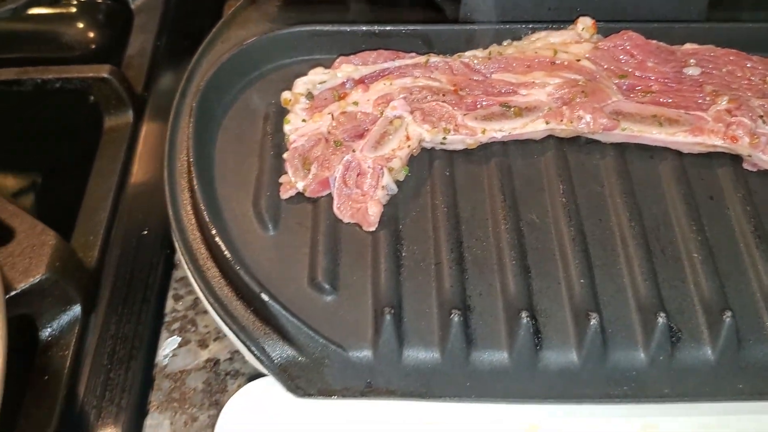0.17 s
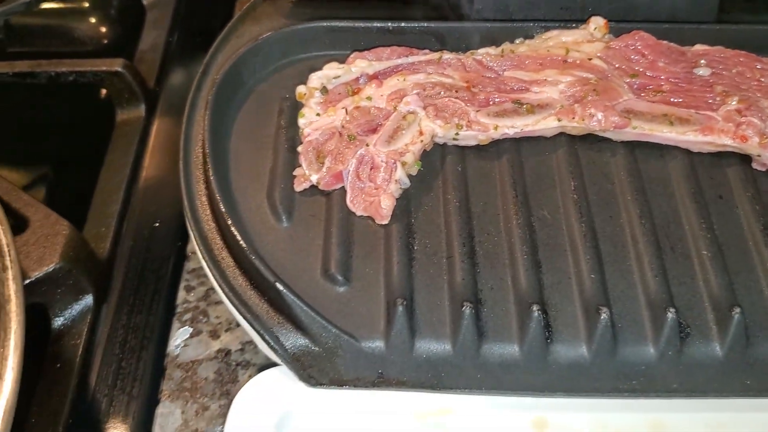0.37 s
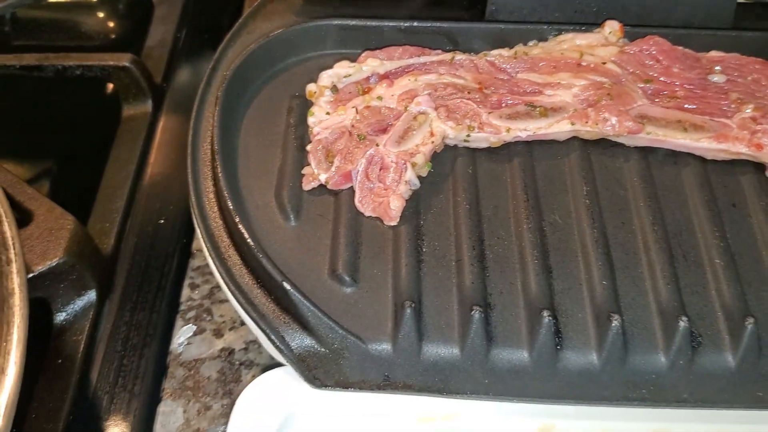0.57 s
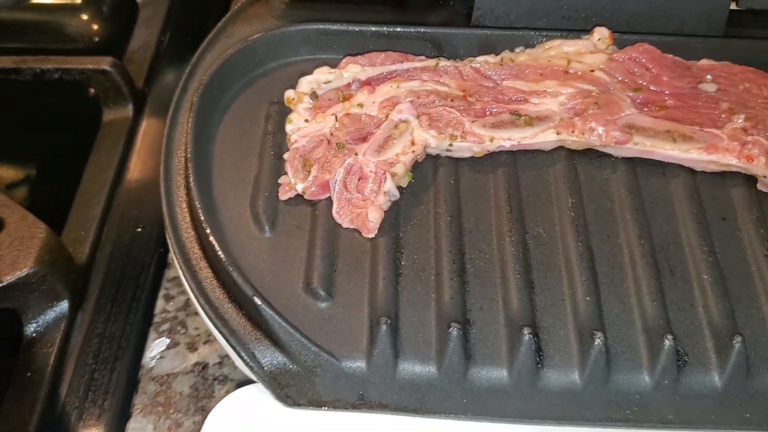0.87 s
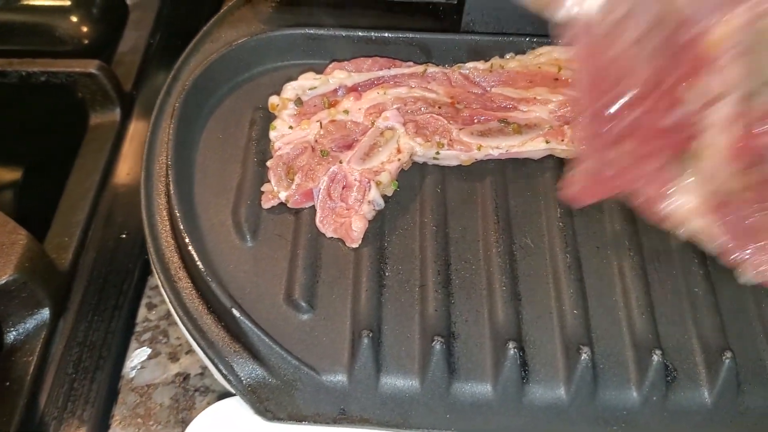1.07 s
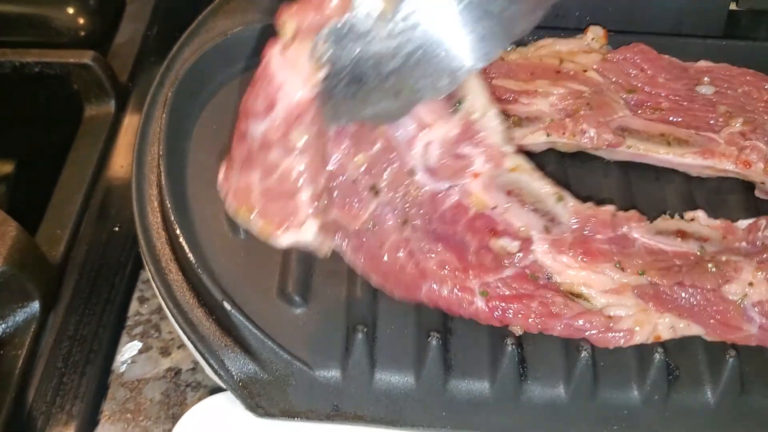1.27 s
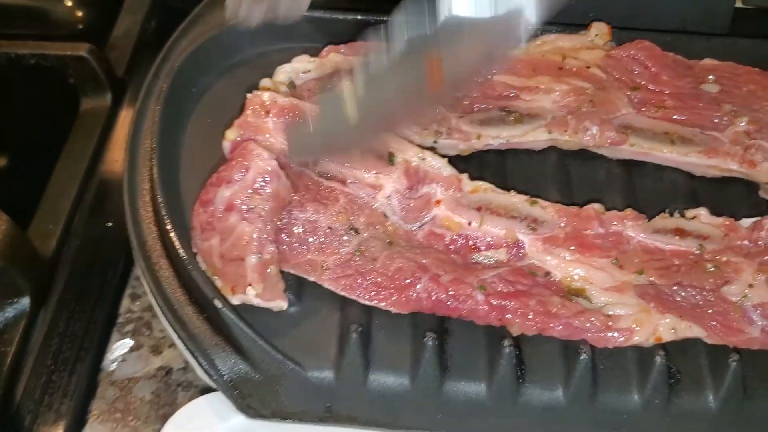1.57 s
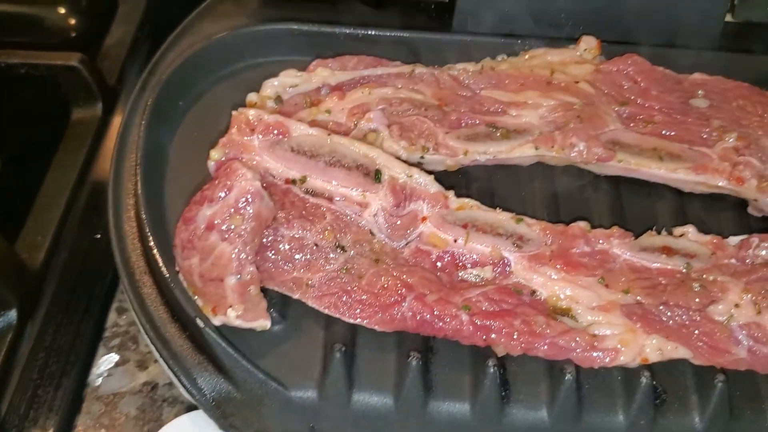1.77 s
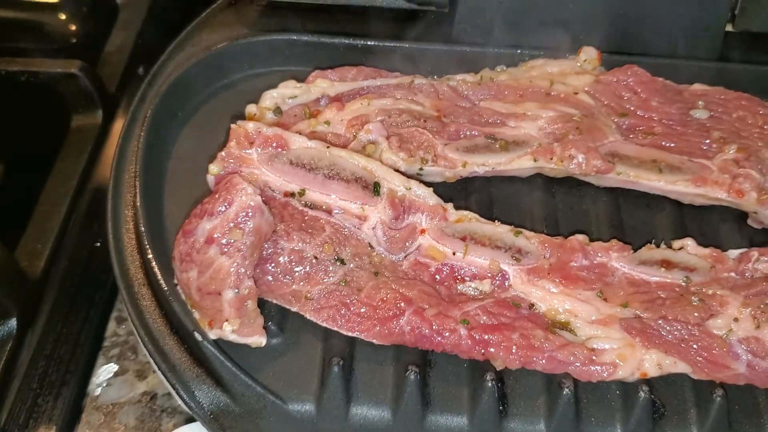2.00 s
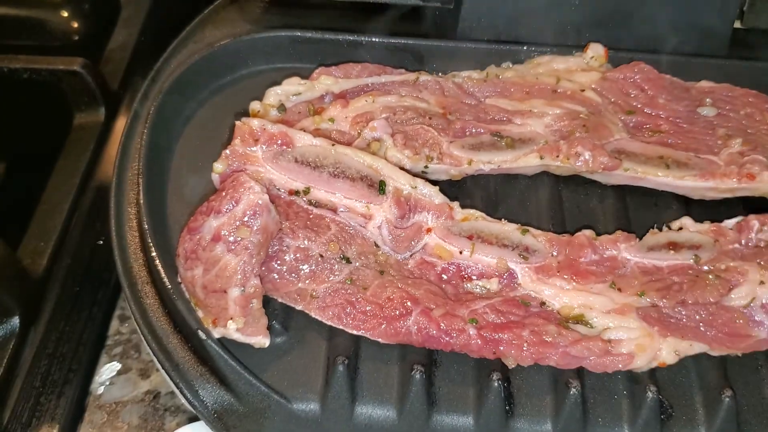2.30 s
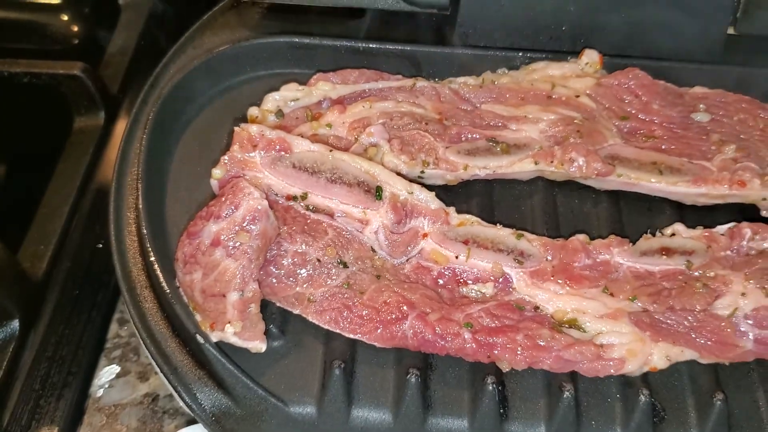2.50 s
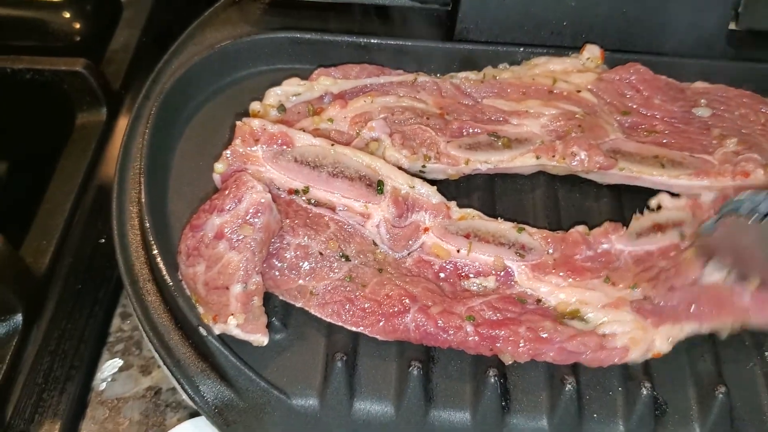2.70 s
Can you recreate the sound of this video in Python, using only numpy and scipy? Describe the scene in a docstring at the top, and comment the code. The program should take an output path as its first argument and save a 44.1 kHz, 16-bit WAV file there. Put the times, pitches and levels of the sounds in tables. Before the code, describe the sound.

Meat sizzles densely and steadily on a grill plate, close to the microphone, with sharp spits of fat, the loudest near 0.8 seconds. At about 1.2 seconds a second strip goes on with a bright hiss, slightly to the right, and the sizzle stays fuller to the end. A soft knock comes at 2 seconds, then a faint, brief squeak. A very low kitchen hum lies underneath.

```python
"""A dense sizzle, close up: marinated meat frying on an electric grill plate, on a phone's two microphones
in a kitchen. Thousands of tiny steam bubbles burst each second and fat spits now and then. A second
strip is laid down, hisses brightly as its marinade flashes to steam, and traps steam in the grooves.
A soft knock on the grill and a short squeak follow; mains hum and low room tone lie behind it all."""
import sys
import numpy as np
from scipy import signal
from scipy.fft import rfft, irfft
from scipy.io import wavfile
from scipy.ndimage import uniform_filter1d

SR = 44100
rng = np.random.default_rng(int(sys.argv[2]) if len(sys.argv) > 2 else 0)


def master_out(mix):
    """Clip the mix to full scale and print it as 16-bit PCM to the path in sys.argv[1]."""
    frames = np.transpose(np.atleast_2d(mix))
    ceiling = np.clip(frames, -1, 1)
    pcm = np.round(ceiling * 32767).astype(np.int16)
    wavfile.write(sys.argv[1], SR, pcm)


N = 125685

# bubbles bursting under the first strip: frequency_hz, relative_db
FIRST_SPECTRUM = [(150, -26), (400, -19.5), (600, -20), (780, -12), (1100, -19), (1500, -13.5),
                  (1900, -7.5), (2200, -8), (2500, -3), (3400, -2), (4300, -1.5), (5500, -1.9),
                  (6600, -8.5), (8000, -8), (8900, -3), (10000, -4), (10900, -6.5), (12200, -4),
                  (15000, -6.5)]
# level of the first strip: time_s, level_db
FIRST_LEVEL = [(0, -21.5), (.35, -20.5), (.75, -21), (1.0, -20.5), (1.16, -21), (1.35, -21), (1.7, -21.5),
               (2.3, -21.5), (2.85, -22)]
# wet marinade flashing to steam at first touch: frequency_hz, relative_db
FLASH_SPECTRUM = [(1000, -19.5), (3000, -15), (5500, -8), (7000, -0.5), (8800, -2.5), (11000, -3),
                  (15000, 3.5)]
# the second strip once it lies flat: frequency_hz, relative_db
SECOND_SPECTRUM = [(200, -32), (600, -15), (1100, -15), (1500, -9), (2200, -5), (3400, 2), (4300, -1),
                   (5400, 1.5), (6800, -9), (9000, -4), (11000, -5.5), (15000, -1.5)]
# snap of spitting fat: frequency_hz, relative_db
SNAP_SPECTRUM = [(300, -35), (1200, -22), (2500, -4), (4500, 0), (7000, -7), (9500, -4), (15000, -4)]
# loudest spits of fat: start_s, peak_db (ahead of the pan), left_minus_right_db
LOUD_SPITS = [(.437, -12, -4), (0.452, -10, -3), (.818, -5, 3), (0.826, -8.5, 2), (1.261, -11, 2),
              (1.447, -9, 1), (1.507, -11, -4), (1.780, -7, -4), (2.201, -11, 0), (2.332, -11, -3)]
# gaps under the first strip: pitch_hz, nominal_width_hz, relative_db
FIRST_POCKETS = [(2488, 62, -2), (2997, 180, -6), (4226, 220, -3), (5450, 180, -6.5), (5770, 120, -3)]
# steam pockets between the second strip and the grooves: pitch_hz, nominal_width_hz, relative_db
SECOND_POCKETS = [(2612, 134, 1), (3330, 180, -10), (4550, 290, -9), (5330, 190, -16), (8600, 250, -6)]
# level of those steam pockets: time_s, level_db
SECOND_POCKET_LEVEL = [(0, -69), (1.4, -34), (1.65, -31.5), (1.9, -34), (2.08, -38), (2.22, -34.5),
                       (2.55, -28.5), (2.85, -39)]
# hollow ring while the tongs are near the plate: pitch_hz, nominal_width_hz, relative_db
HOLLOW_MODES = [(1930, 260, 0), (2530, 350, -7)]
# swells of that ring: centre_s, half_length_s, level_db
HOLLOW_SWELLS = [(1.262, .1, -35.5), (2.798, 0.027, -34)]
# damped modes of the grill: pitch_hz, relative_db, t60_s
GRILL_MODES = [(160, -17, .06), (583, -1, 0.026), (850, -2, 0.028), (1050, 0.5, 0.025), (1380, -5, 0.027),
               (1600, -1, .025)]
# squeaks, probably steam forced out under the meat: start_s, length_s, start_hz, end_hz, level_db
SQUEAKS = [(2.162, 0.0178, 660, 670, -40), (2.179, 0.058, 690, 755, -36.5)]
# mains hum in the kitchen: pitch_hz, base_level_db
HUM_TONES = [(60, -63), (120, -59.5), (240, -65.5), (258.4, -69)]
# slow rise and fall of the hum: time_s, gain_db
HUM_GAIN = [(0, -1), (.5, 0), (.8, 3.5), (1.25, 2), (1.6, -0.5), (2.4, -3), (2.85, -1)]
# kitchen room tone: frequency_hz, relative_db
ROOM_SPECTRUM = [(25, -26), (60, -6), (100, -5), (190, -6.5), (300, -11), (420, 3), (720, 3.5),
                 (1100, -3.5), (3000, -23)]
# colour of the phone's two microphone ports: frequency_hz, left_minus_right_db
PORT_BALANCE = [(200, -1.3), (2400, -0.8), (3400, -0.0), (5400, -3), (6600, 7.5), (7800, 2.7), (8700, -5),
                (9800, -6), (11000, 3.5), (12500, -0.7), (15000, 2)]
# how alike the sound is at the two ports: frequency_hz, correlation
PORT_LIKENESS = [(100, 0.75), (750, 0.91), (1250, 0.37), (1900, 0.44), (2600, 0.23), (3100, 0.033),
                 (15000, .01)]


def first_strip(shade_s=1.19, shade_half_s=.09, shade_db=-4):
    """Steady frying, its upper middle shaded as the second strip passes between it and the phone."""
    fry = sizzle(FIRST_SPECTRUM) * curve(FIRST_LEVEL)
    shade = (1 - undb(shade_db)) * swell(shade_s, shade_half_s)
    return fry - shade * resonate(fry, hz=4360, width_hz=2000)


def marinade_flash(touch_s=1.21, attack_s=.018, hold_s=.35, decay_s=.41, level_db=-23.5):
    """The second strip touches the plate and its wet marinade flashes to steam: a bright hiss, right."""
    age = times() - touch_s
    attack = np.clip(age / attack_s, 0, 1)
    decay = np.exp(-np.maximum(age - hold_s, 0) / decay_s)
    return sizzle(FLASH_SPECTRUM) * attack * decay * undb(level_db) * pan(-7.5)


def second_strip(laid_s=1.324, settle_s=.25, level_db=-23, fade_db_per_s=.16):
    """A fuller sizzle builds as the second strip settles flat on the plate."""
    age = times() - laid_s
    contact = np.clip(age / settle_s, 0, 1)
    return sizzle(SECOND_SPECTRUM) * contact * undb(level_db - fade_db_per_s * age)


def sizzle(spectrum):
    """Steam bubbles burst so densely that they merge into a hiss."""
    return unit(colour(bursts(per_s=16000, spread_db=2.5), spectrum))


def bursts(per_s, spread_db):
    """Random one-sample bursts, many small and a few large, as heard at both ports."""
    happens = rng.random((2, N)) < per_s / SR
    size = undb(spread_db * np.minimum(rng.exponential(size=(2, N)), 5))
    polarity = rng.choice([-1, 1], (2, N))
    return at_ports(happens * size * polarity)


def flurries(frying, bands=36, sputter_db=1.3, sputter_per_s=40):
    """Bubbles of each size, and so of each pitch, come in their own flurries."""
    spectrum, out = rfft(frying), 0
    band_position = over_hz([(1200, 0), (16000, bands - 1)])
    for k in range(bands):
        band = irfft(spectrum * np.maximum(1 - np.abs(band_position - k), 0), N)
        out += band * unit(undb(sputter_db * wander(sputter_per_s)))
    return out


def fat_spits(decay_s=.00014, crackle_db=-34):
    """Fat snaps sharply near the microphones: a few loud spits over a light random crackle."""
    out = unit(colour(bursts(per_s=260, spread_db=2.5), SNAP_SPECTRUM)) * undb(crackle_db)
    snap = colour(signal.unit_impulse(N), SNAP_SPECTRUM)[:SR // 100]
    age = times()[:len(snap)]
    for start_s, peak_db, pan_db in LOUD_SPITS:
        spray = rng.standard_normal((2, len(age))) * np.exp(-age / decay_s)
        spit = signal.lfilter(snap, 1, spray)
        start = int(start_s * SR)
        out[:, start:start + len(age)] += spit / np.abs(spit).max() * undb(peak_db) * pan(pan_db)
    return out


def steam_pockets(first_db=-29.5, first_fade_db_per_s=4):
    """Bursting bubbles ring the gaps under both strips and the hollow near the tongs."""
    drive = bursts(per_s=2500, spread_db=2)
    first = ring(drive, FIRST_POCKETS, flutter_db=1.8) * undb(first_db - first_fade_db_per_s * times())
    second = ring(drive, SECOND_POCKETS, flutter_db=1) * curve(SECOND_POCKET_LEVEL)
    tongs_near = sum(undb(db) * swell(centre_s, half_s) for centre_s, half_s, db in HOLLOW_SWELLS)
    hollow = ring(drive, HOLLOW_MODES, flutter_db=4) * tongs_near
    return first + second + hollow


def ring(drive, modes, flutter_db, flutter_per_s=32):
    """Bursts ring a set of resonances, each swelling and fading on its own."""
    out = 0
    for hz, width_hz, db in modes:
        stage_hz = 1.35 * width_hz  # two stages in series narrow the peak, so each is set wider
        ringing = resonate(resonate(drive, hz, stage_hz), hz, stage_hz)
        out += ringing * undb(db + flutter_db * wander(flutter_per_s))
    return unit(out)


def grill_knock(start_s=2.0465, contact_s=.0035, peak_db=-22, scuff_decay_s=.006, scuff_db=-9):
    """A soft, scuffing contact rings the damped modes of the grill."""
    age = np.maximum(times() - start_s, 0)
    body = sum(undb(db) * sine(hz, age) * undb(-60 * age / t60_s) for hz, db, t60_s in GRILL_MODES)
    scuff = rng.standard_normal(N)
    for _ in range(2):
        scuff = resonate(scuff, hz=850, width_hz=900)
    scuff *= np.exp(-age / scuff_decay_s)
    push = np.minimum(age / contact_s, 1) ** 2
    knock = unit(body * push) + undb(scuff_db) * unit(scuff * push)
    return knock / np.abs(knock).max() * undb(peak_db)


def squeaks(waver=.036, roughness=.31, release_share=.27):
    """Thin, rough tones rise, swell and stop: probably steam forced out under the meat."""
    out = np.zeros(N)
    for start_s, length_s, start_hz, end_hz, db in SQUEAKS:
        progress = np.clip((times() - start_s) / length_s, 0, 1)
        hz = (start_hz + (end_hz - start_hz) * progress) * (1 + waver * wander(250))
        tone = np.sqrt(2) * np.sin(2 * np.pi * np.cumsum(hz) / SR)
        envelope = np.sqrt(progress) * np.minimum((1 - progress) / release_share, 1)
        out += undb(db) * tone * envelope * (1 + roughness * wander(300))
    return out


def mains_hum(waver_db=-.5, waver_per_s=2.84):
    """An appliance hums in the background, each tone wavering slightly."""
    hum = sum(undb(db + waver_db * wander(waver_per_s)) * sine(hz, times()) for hz, db in HUM_TONES)
    return np.sqrt(2) * hum * curve(HUM_GAIN)


def room_tone(level_db=-51.5):
    """Low, steady noise of the kitchen around the phone."""
    air = at_ports(rng.standard_normal((2, N)))
    return unit(colour(air, ROOM_SPECTRUM)) * undb(level_db)


def at_ports(pair):
    """Two unrelated signals become two microphone ports: alike in the bass, unrelated in the treble."""
    likeness = np.clip(over_hz(PORT_LIKENESS), 0, 1)
    mid, side = rfft(pair) * np.sqrt([1 + likeness, 1 - likeness])
    return irfft(np.array([mid + side, mid - side]), N)


def pan(left_minus_right_db):
    return undb(np.array([[1], [-1]]) * left_minus_right_db / 2)


def undb(db):
    return 10 ** (np.asarray(db) / 20)


def unit(x):
    """Scale to rms 1."""
    return x / np.sqrt(np.mean(x ** 2))


def times():
    return np.arange(N) / SR


def sine(hz, time_s):
    """Sine with a random starting phase."""
    return np.sin(2 * np.pi * (hz * time_s + rng.random()))


def swell(centre_s, half_s):
    """Bell curve: 1 at the centre, 1/e at half_s to either side."""
    return np.exp(-((times() - centre_s) / half_s) ** 2)


def curve(rows):
    """Gain over time from (time_s, level_db) points."""
    return undb(np.interp(times(), *np.array(rows).T))


def wander(per_s):
    """Smooth random wander with rms 1."""
    step = max(int(SR / per_s), 2)
    stairs = np.repeat(rng.standard_normal(N // step + 1), step)
    return unit(uniform_filter1d(stairs, step)[:N])


def over_hz(rows):
    """(frequency_hz, value) points joined on a log-frequency axis."""
    hz, value = np.array(rows, float).T
    bin_hz = np.arange(N // 2 + 1) * SR / N
    return np.interp(np.log(bin_hz + 1), np.log(hz), value)


def colour(x, rows):
    """Minimum-phase filter that follows (frequency_hz, gain_db) points."""
    cepstrum = irfft(np.log(undb(over_hz(rows))), N)
    cepstrum[1:N // 2] *= 2
    cepstrum[N // 2:] = 0
    return irfft(rfft(x) * np.exp(rfft(cepstrum)), N)


def resonate(x, hz, width_hz):
    """One resonance, gain 1 at its centre."""
    return signal.lfilter(*signal.iirpeak(hz, hz / width_hz, fs=SR), x)


def scene():
    """The grill plate close in front, the kitchen behind."""
    frying = flurries(first_strip() + marinade_flash() + second_strip())
    grill = frying + steam_pockets() + fat_spits() + grill_knock() + squeaks()
    return grill + mains_hum() + room_tone()


def record(dry, low_cut_hz=48, high_cut_hz=15750):
    """Each microphone port has its own colour; the phone cuts the deep bass and the top."""
    left = colour(dry[0], [(hz, db / 2) for hz, db in PORT_BALANCE])
    right = colour(dry[1], [(hz, -db / 2) for hz, db in PORT_BALANCE])
    low_cut = signal.butter(2, low_cut_hz, "high", fs=SR, output="sos")
    high_cut = signal.ellip(12, .1, 80, high_cut_hz, fs=SR, output="sos")
    return signal.sosfilt(high_cut, signal.sosfilt(low_cut, np.array([left, right])))


dry = scene()
out = record(dry)
master_out(out)
```